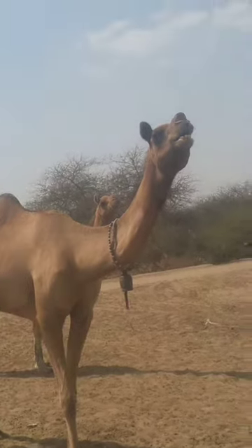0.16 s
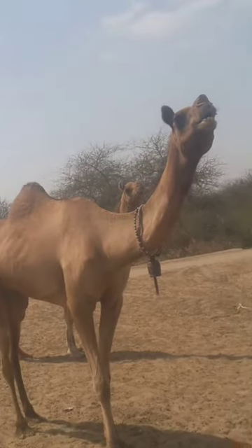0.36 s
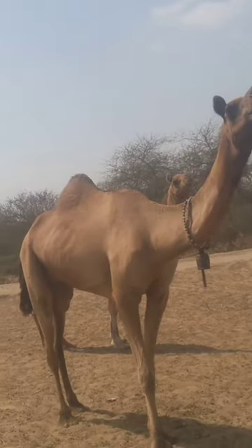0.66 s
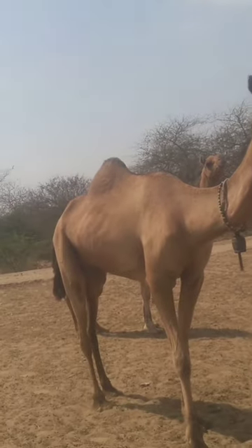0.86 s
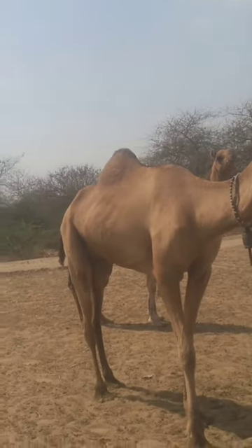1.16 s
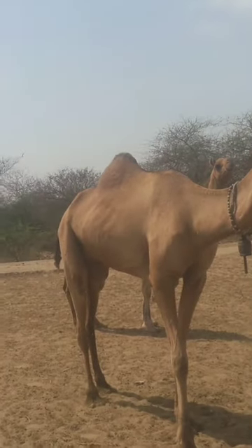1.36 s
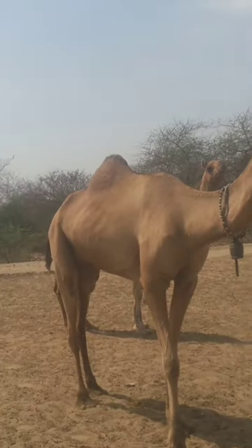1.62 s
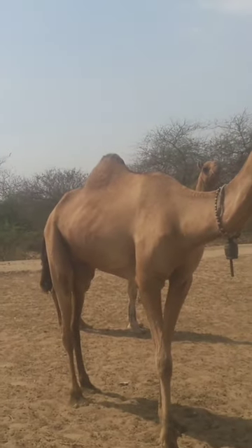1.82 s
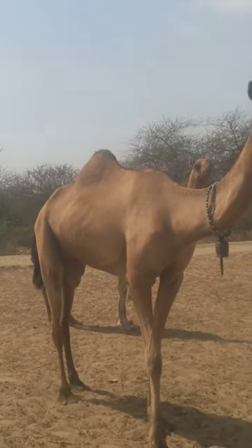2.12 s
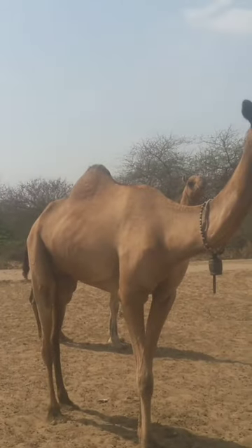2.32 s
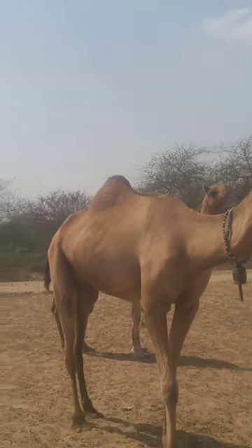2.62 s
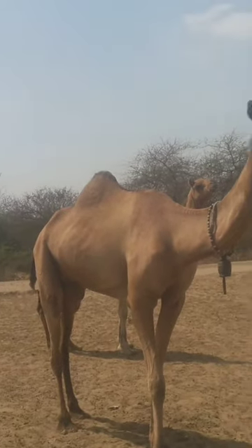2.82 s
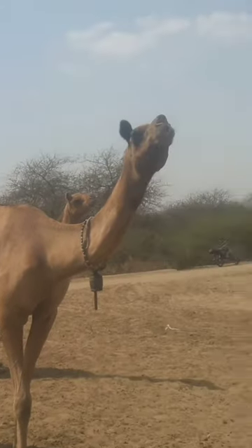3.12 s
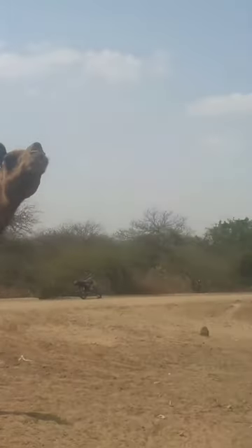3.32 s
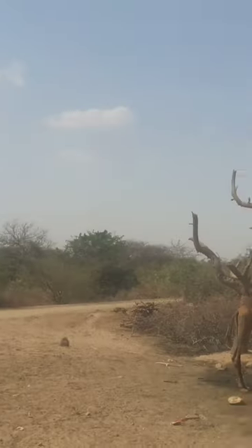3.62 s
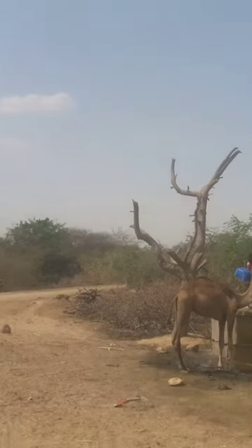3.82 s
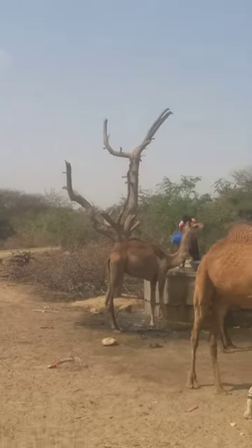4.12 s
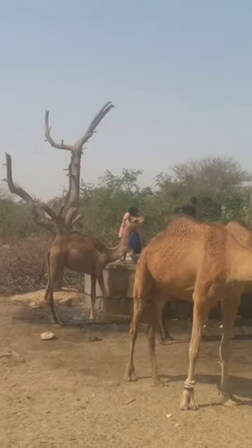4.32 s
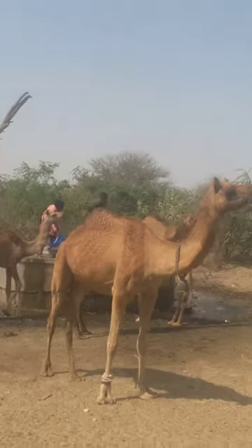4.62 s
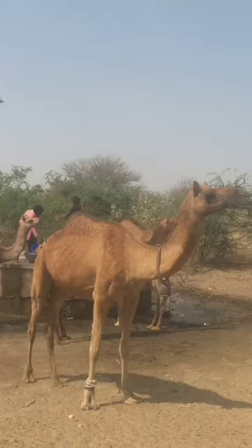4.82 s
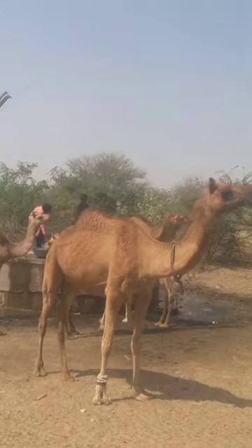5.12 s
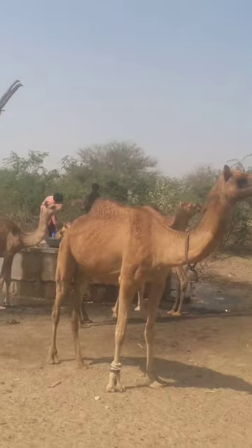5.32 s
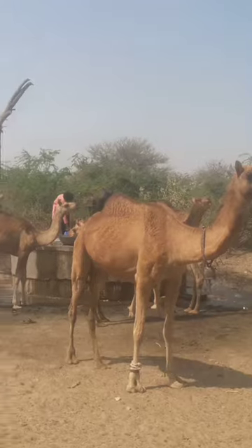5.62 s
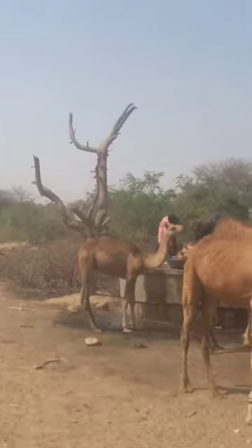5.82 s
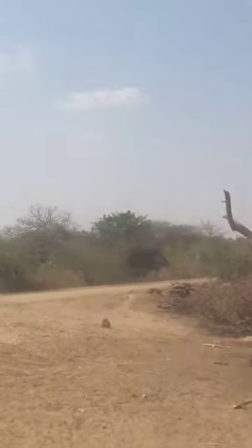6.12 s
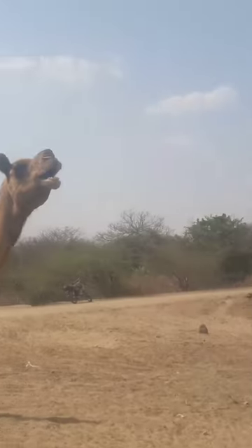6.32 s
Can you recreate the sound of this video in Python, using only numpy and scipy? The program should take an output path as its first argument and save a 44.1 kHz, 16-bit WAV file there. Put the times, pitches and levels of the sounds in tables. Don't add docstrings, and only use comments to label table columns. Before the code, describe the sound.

Outdoors, wind rumble, a puttering distant engine and faint birds, then a nearby camel suddenly bellows, a low rough rattling moan cut off at full strength.

```python
import sys
import numpy as np
from scipy import signal
from scipy.io import wavfile
from scipy.ndimage import uniform_filter1d, minimum_filter1d

SR = 44100
rng = np.random.default_rng(int(sys.argv[2]) if len(sys.argv) > 2 else 0)


def materialize(psi):
    bounded = np.clip(np.atleast_2d(psi).T, -1, 1)
    quanta = np.round(bounded * 32767).astype(np.int16)
    wavfile.write(sys.argv[1], SR, quanta)


def volts_from_decibels(level):
    exponent = np.asarray(level, float) / 20
    return 10 ** exponent


N = 284886
TIME = np.arange(N) / SR
JAW_DROPS_S = 5.745
# time_s, slap_db, brightness_db, stall_depth_db
SLAPS = [(5.756, -29, -9.5, -6), (5.77, -29, -4, 5), (5.782, -29.5, -5, -3.5), (5.797, -30, -17.5, -3),
         (5.812, -29, -8.5, -8), (5.823, -28.5, -8, 0), (5.838, -29, -22.5, -0.5), (5.865, -28.5, -10, -3),
         (5.878, -31.5, -8.5, -2), (5.888, -30, -8.5, -7), (5.898, -32.5, -18, -5), (5.92, -32, -7, -16),
         (5.941, -38, -20, -8.5), (5.964, -25, -11.5, -7.5), (5.977, -25, -18.5, -3),
         (5.999, -34, -15.5, -8), (6.02, -25.5, -8, 1.5), (6.029, -33.5, -14, -3), (6.042, -29, -21, -0.5),
         (6.068, -31, -9.5, -5), (6.078, -34.5, -22, -4.5), (6.106, -26, -24, -7),
         (6.118, -19.5, -24.5, -8), (6.13, -30.5, -20, -3.5), (6.174, -16, -18.5, -1),
         (6.186, -26.5, -23.5, -7.5), (6.2, -24, -19, -4.5), (6.213, -25.5, -15, -5.5),
         (6.239, -23, -21, -0.5), (6.264, -21.5, -20.5, 1), (6.276, -21, -22, 2), (6.3, -28, -21, -5),
         (6.311, -29, -19.5, -3), (6.325, -22, -12.5, -4.5), (6.355, -22.5, -6, -12.5),
         (6.363, -26, -19, 1), (6.377, -17, -16, -2.5), (6.39, -28.5, -22, -7), (6.402, -24, -7.5, -2),
         (6.414, -21.5, -24.5, -6), (6.425, -21, -20.5, -6), (6.439, -31, -11, -3)]
# freq_hz, width_hz, level_db
MOUTH_MODES = [(428, 66, 0.5), (920, 290, -4.5), (1040, 110, 1), (1183, 88, 3), (1351, 47, 0.5),
               (1440, 72, -5)]


def evened(x):
    return x / np.sqrt(np.mean(x ** 2) + 1e-20)


def add(mix, start_s, sound):
    part = mix[round(start_s * SR):][:len(sound)]
    part += sound[:len(part)]


def follow(rows, t):
    return np.interp(t, *np.transpose(rows))


def curves(rows):
    s, *columns = np.transpose(rows)
    t = np.arange(s[0], s[-1], 1 / SR)
    return t, [np.interp(t, s, c) for c in columns]


def drift(size, rate_hz):
    width = int(SR / rate_hz)
    return evened(uniform_filter1d(uniform_filter1d(rng.standard_normal(size), width), width))


def resonate(x, hz, width_hz):
    turn = np.exp(2j * np.pi * np.cumsum(hz * np.ones(len(x))) / SR)
    r = np.exp(-np.pi * width_hz / SR)
    return 2 * (turn * signal.lfilter([1 - r], [1, -r], x / turn)).real


def lowpass(x, order, cutoff_hz):
    return signal.lfilter(*signal.butter(order, cutoff_hz, fs=SR), x)


def pulses(rate, spread_db, weak_db, restarts=()):
    turns = np.cumsum(rate) / SR
    for at in restarts:
        turns[at:] += np.ceil(turns[at]) - turns[at]
    cycle = np.floor(turns).astype(int)
    size_db = spread_db * rng.standard_normal(1000) + weak_db * (np.arange(1000) % 2)
    return np.diff(cycle, prepend=0) * volts_from_decibels(size_db[cycle])


def noise(shape, patchy_db):
    hz = np.fft.rfftfreq(1024, 1 / SR)
    a, b, patches = rng.standard_normal((N // 256 + 5, 513, 3)).T
    patches = evened(uniform_filter1d(uniform_filter1d(patches, 10, 0), 8, 1))
    f, db = np.transpose(shape)
    colour_db = np.interp(np.log(hz + 1), np.log(f), db, left=-90, right=-90)
    spectra = (a + 1j * b) * volts_from_decibels(colour_db[:, None] + patchy_db * patches)
    return evened(signal.istft(spectra, nperseg=1024, noverlap=768)[1][:N])


def tone(rows, orders, waver_db):
    t, (hz, db) = curves(rows)
    turns = np.cumsum(hz) / SR
    stack = sum(volts_from_decibels(d + waver_db * drift(len(t), 0.89)) * np.sin(2 * np.pi * k * turns) for k, d in orders)
    fades = signal.windows.tukey(len(t), min(0.055 * SR / len(t), 1))
    return t[0], np.sqrt(2) * volts_from_decibels(db) * stack * fades


def wind_and_road():
    # time_s, level_db
    wind_level = [(0, -45.5), (.8, -44.5), (1.6, -40.5), (2.4, -43.5), (3.1, -41.5), (4.0, -44), (4.8, -48),
                  (5.5, -48.5)]
    breeze_level = [(0, -67.5), (.8, -66), (1.6, -66.5), (2.1, -71.5), (4.3, -75.5), (4.8, -73.5)]
    # freq_hz, level_db
    rumble_colour = [(15, -35), (40, -24), (80, -1.5), (140, 2), (250, -4), (460, -16), (520, -28),
                     (900, -39.5)]
    rustle_colour = [(1500, -31.5), (2100, 1.5), (2600, 2.5), (3100, -5), (3600, -11.5), (5000, -30),
                     (8000, -52.5)]
    wash_colour = [(100, -12), (300, -6.5), (600, -1), (1000, -6), (1500, -10.5), (2500, -28.5),
                   (4000, -44)]
    roar_colour = [(1000, -34.5), (1450, -6.5), (1700, 0), (1950, -2.5), (2250, -10), (3000, -37.5)]
    hiss_colour = [(3000, -4.5), (4000, -1.5), (5000, -5), (6300, -10), (8000, -14), (10000, -13),
                   (12500, -6.5), (15700, -8)]
    nearest_s, approach_s, depart_s, far_off_db = 1.83, 1.66, 1, -12.5
    away = (TIME - nearest_s) / np.where(TIME < nearest_s, approach_s, depart_s)
    pass_db = far_off_db * (1 - np.exp(-away ** 2))
    calm_db = -5 * np.clip((0.6 - TIME) / 0.011, 0, 1)
    lumps_db = 0.24 * drift(N, 30) + calm_db
    rumble = volts_from_decibels(follow(wind_level, TIME) + lumps_db - 1.5) * noise(rumble_colour, 0.86)
    rustle = volts_from_decibels(follow(breeze_level, TIME)) * noise(rustle_colour, 2.6)
    wash = volts_from_decibels(-58 + 0.42 * pass_db) * noise(wash_colour, 1.6)
    roar = volts_from_decibels(-63.5 + pass_db) * noise(roar_colour, 1.4)
    return rumble + rustle + wash + roar + volts_from_decibels(-79) * noise(hiss_colour, 0.3)


def putter():
    # time_s, firings_per_s
    firing = [(0, 28), (.8, 28.7), (1.7, 28.9), (2.9, 29.45), (3.5, 29.5), (3.8, 29.9), (4.4, 30),
              (4.7, 29.2), (5.6, 28.9)]
    # time_s, level_db
    putter_level = [(0, -56), (.58, -55.5), (.63, -49), (1.5, -51), (2.3, -51), (3.0, -56), (3.6, -56),
                    (4.3, -57.5), (5.0, -56.5), (5.599, -57.5)]
    # freq_hz, width_hz, level_db
    exhaust = [(131, 180, -11.5), (271, 156, 1.5), (419, 20, 0.5)]
    # multiple, level_db (re pops)
    pipe_orders = [(3, -3), (4, 1), (5, 2), (6, -6), (8, -5)]
    rate = follow(firing, TIME) * (1 + 0.0027 * drift(N, 25))
    pops = -pulses(rate, spread_db=2.5, weak_db=0.5)
    pipe = sum(volts_from_decibels(d) * resonate(pops, hz, w) for hz, w, d in exhaust)
    pipe = evened(signal.lfilter(*signal.cheby1(4, 1, 480, fs=SR), pipe))
    turns = np.cumsum(rate) / SR
    hum = sum(volts_from_decibels(d + 2 * drift(N, 4)) * np.sin(2 * np.pi * k * turns + k * k) for k, d in pipe_orders)
    fade = np.clip((putter_level[-1][0] - TIME) / 0.05, 0, 1)
    return volts_from_decibels(follow(putter_level, TIME)) * (pipe + hum) * fade


def drone():
    # time_s, level_db
    drone_level = [(0, -71), (1.5, -51.5), (2.5, -54), (3.502, -58), (3.8, -51), (4.5, -49), (5.1, -51.5),
                   (5.799, -46), (6.0, -60)]
    # time_s, pitch_hz
    drone_pitch = [(0, 67), (.6, 70.9), (1.4, 73.2), (2.4, 78.2), (3.4, 81.6), (3.8, 84.5), (5.0, 88.6),
                   (6.0, 91.5)]
    # multiple, level_db
    drone_orders = [(1, 0), (2, 0), (3, -10), (4, -16)]
    rows = [(s, follow(drone_pitch, s), db) for s, db in drone_level]
    return tone(rows, drone_orders, waver_db=0.6)


def whistle(hz, fall_hz, length_s, db):
    u = np.linspace(0, 1, int(1.17 * length_s * SR))
    pitch_hz = hz + fall_hz * ((1 - u) ** 1.58 - 0.4)
    return volts_from_decibels(db) * np.hanning(len(u)) * np.sin(2 * np.pi * np.cumsum(pitch_hz) / SR)


def birds():
    # start_s, pitch_hz, length_s, level_db
    chirp_notes = [(0.001, 3120, .012, -62), (0.04, 2960, 0.008, -56), (0.404, 2760, .01, -58),
                   (.564, 2950, .006, -57), (.754, 3350, .01, -64), (.918, 2460, .012, -59),
                   (3.765, 3700, .014, -70), (2.912, 4380, .014, -72), (2.922, 3950, .01, -74),
                   (3.052, 4250, .016, -69), (3.062, 3850, .01, -74), (0.172, 2780, .008, -55.5),
                   (0.228, 2630, .008, -55), (0.26, 2710, .008, -65), (0.319, 2810, 0.01, -58),
                   (0.327, 3200, 0.016, -60), (.378, 3260, .01, -63), (0.553, 2520, 0.011, -55),
                   (0.576, 2830, 0.0086, -57), (0.645, 3320, .01, -59), (0.658, 3450, 0.022, -61),
                   (0.652, 3930, .008, -65), (1.218, 3830, .008, -64), (1.085, 2660, .01, -70),
                   (0.748, 3050, 0.0074, -54), (.85, 3210, 0.016, -56), (0.898, 3200, 0.0072, -57),
                   (1.205, 3360, 0.008, -61), (1.227, 3450, 0.019, -58), (1.489, 2830, 0.02, -59),
                   (2.6, 2980, 0.01, -61), (4.947, 2820, 0.0027, -49.5), (5.34, 2300, 0.0057, -52)]
    peep_notes = [(0.079, 2655, 0.038, -56), (0.4, 2646, 0.037, -61), (1.545, 3400, 0.015, -61.5),
                  (2.644, 2660, 0.017, -61.5), (2.525, 2510, .015, -64), (3.385, 2870, 0.014, -66),
                  (0.42, 2670, .025, -62), (2.79, 3050, .012, -70), (3.772, 3280, .012, -71),
                  (3.675, 2540, 0.014, -66), (.95, 2600, .025, -63), (.98, 2350, .02, -62),
                  (3.129, 2950, .012, -66), (3.392, 2400, 0.019, -63), (3.565, 2280, 0.024, -65),
                  (3.75, 970, .03, -64), (4.44, 820, 0.024, -55), (4.455, 1000, 0.012, -54),
                  (4.445, 1400, 0.013, -57), (4.468, 1490, 0.0093, -55), (4.468, 2250, .008, -61),
                  (4.49, 512, 0.046, -51.5), (4.545, 1525, 0.064, -65.5), (4.6, 1220, 0.11, -63.5),
                  (5.18, 1246, 0.016, -59.5), (5.247, 2510, 0.016, -60)]
    track = np.zeros(N)
    for rows, fall_share in ((chirp_notes, 0.17), (peep_notes, 0.02)):
        for s, hz, length_s, db in rows:
            fall_hz = fall_share * hz * (0.01 / length_s) ** 0.5
            add(track, s - 0.069 * length_s, whistle(hz, fall_hz, length_s, db))
    return track


def thump(db, hz):
    t = np.arange(0.05 * SR) / SR
    turns = np.cumsum(hz * (0.58 + 1.79 * np.exp(-t / 0.0039))) / SR
    shape = (1 - np.exp(-t / 0.002)) ** 2 * np.exp(-(t / 0.0087) ** 2)
    swing = -1.3 * volts_from_decibels(db) * np.sin(2 * np.pi * (turns + 0.05)) * shape
    return np.r_[np.zeros(380), swing]


def gusts():
    # start_s, peak_db, pitch_hz
    gust_rows = [(0.601, -53, 143), (0.787, -30, 136), (0.929, -37, 107), (1.018, -34.5, 224),
                 (1.115, -25, 141), (1.427, -30, 65), (1.498, -33, 127), (1.508, -17.5, 127),
                 (1.533, -44, 113), (1.582, -18.5, 148), (1.669, -27.5, 91.5), (2.213, -25, 109),
                 (2.359, -30, 140), (2.6, -29, 88.8), (2.678, -56, 166), (3.429, -25.5, 166),
                 (3.458, -27, 92), (4.142, -40, 159), (4.557, -32.5, 124), (5.299, -35, 181)]
    track = np.zeros(N)
    for s, db, hz in gust_rows:
        add(track, s, thump(db, hz))
    return track


def scuffs():
    # start_s, length_s, low_hz, high_hz, level_db
    scuff_rows = [(1.27, .15, 3200, 5800, -80), (1.435, .015, 3200, 7000, -76),
                  (1.555, .09, 3300, 4900, -71.5), (1.57, .075, 4800, 7600, -82),
                  (2.6, .02, 3000, 5500, -79), (3.42, .02, 2600, 3900, -75), (5.01, .03, 3600, 4400, -76),
                  (4.51, .015, 600, 1900, -62), (4.44, .035, 2000, 3900, -71), (4.5, .08, 1300, 2600, -71),
                  (4.72, .04, 2600, 3300, -71), (4.82, .05, 2400, 3200, -73), (4.865, .02, 3500, 4100, -76),
                  (4.95, .06, 2400, 3300, -72), (5.09, .08, 1800, 3300, -70), (5.25, .06, 2300, 3400, -71),
                  (5.41, .06, 2400, 3300, -72)]
    track = np.zeros(N)
    grains = volts_from_decibels(2.1 * drift(SR // 3, 300))
    for s, length_s, low_hz, high_hz, db in scuff_rows:
        grit = (rng.standard_normal(SR // 3) * grains)[:int(1.3 * length_s * SR)]
        band = signal.lfilter(*signal.butter(3, [low_hz, high_hz], "band", fs=SR), grit)
        add(track, s, volts_from_decibels(db) * evened(band) * signal.windows.tukey(len(band), 0.5))
    return track


def far_calls():
    # start_s, length_s, pitch_hz, level_db
    call_rows = [
        (4.755, 0.257, 225.2, -51),
        (5.143, 0.16, 222.5, -51.5),
    ]
    ends_db, rise_hz = -5, 1.6
    track = np.zeros(N)
    for s, length_s, hz, db in call_rows:
        rows = [(s, hz - rise_hz, db + ends_db), (s + length_s / 2, hz, db),
                (s + length_s, hz + rise_hz, db + ends_db)]
        add(track, *tone(rows, [(1, -5), (2, -5), (3, -19)], waver_db=2))
    return track


def opening_note():
    # time_s, pitch_hz, level_db
    note_path = [(5.51, 233, -49), (5.53, 236.7, -32.5), (5.554, 221.4, -23), (5.59, 230.3, -25.5),
                 (5.62, 243, -32)]
    # multiple, level_db
    note_orders = [(1, 2), (2, -19), (3, -23), (4, -40), (5, -37.5)]
    return tone(note_path, note_orders, waver_db=0.33)


def ring(drive, hz, width_hz, hold):
    x = resonate(resonate(drive, hz, width_hz), hz, 3 * width_hz)
    swing = np.sqrt(uniform_filter1d(uniform_filter1d(x ** 2, 300), 300) + 1e-12)
    return evened(resonate(resonate(x / swing ** hold, hz, 82), hz, 190))


def body_band(drive, hz, width_hz, db):
    return volts_from_decibels(db) * evened(resonate(resonate(drive, hz, width_hz), hz, width_hz))


def hollow(x, modes, quick=3):
    return sum((-1) ** k * volts_from_decibels(db) * resonate(resonate(x, hz, w), hz, quick * w) / np.sqrt(w)
               for k, (hz, w, db) in enumerate(modes))


def palate(x, t):
    # freq_hz, width_hz, level_db
    palate_modes = [(1680, 85, -1.5), (1945, 85, -1)]
    gape_modes = [(2350, 110, -11), (2540, 240, -12)]
    # time_s, level_db
    gape_level = [(5.75, -15), (5.95, -8), (6.1, -4), (6.46, 2)]
    # freq_hz, width_hz, level_db, change_db_per_s
    teeth_mode = (2873.5, 200.5, -13, -17)
    open_s = t - JAW_DROPS_S
    sag = 1 - 0.066 * open_s
    teeth_hz, teeth_width_hz, teeth_db, teeth_db_per_s = teeth_mode
    roof = hollow(x, [(hz * sag, w, db) for hz, w, db in palate_modes])
    teeth = hollow(x, [(teeth_hz - 230 * open_s, teeth_width_hz, teeth_db)])
    gape = volts_from_decibels(follow(gape_level, t)) * hollow(x, gape_modes)
    return roof + volts_from_decibels(teeth_db_per_s * open_s) * teeth + gape


def fold_pulses(t):
    # time_s, pulses_per_s
    fold_rate = [(5.5, 88), (5.75, 72.6), (6.0, 92.3), (6.2, 81), (6.46, 86)]
    rate = follow(fold_rate, t) * (1 + 0.1 * drift(len(t), 60))
    restarts = [int((row[0] - t[0]) * SR) for row in SLAPS]
    return evened(pulses(rate, spread_db=2.5, weak_db=-3.5, restarts=restarts))


def slap_smacks(t):
    at_mouth, at_palate = np.zeros((2, len(t)))
    for s, db, bright_db, _ in SLAPS:
        wet = rng.standard_normal(400) * np.exp(-np.arange(400) / 45) / 22
        wet[0] = 1
        add(at_mouth, s - t[0], wet * volts_from_decibels(db))
        add(at_palate, s - t[0], wet * volts_from_decibels(db + bright_db + 5))
    mouth = lowpass(hollow(at_mouth, MOUTH_MODES, quick=6.9), 2, 1900)
    return volts_from_decibels(48.5) * mouth + volts_from_decibels(55) * palate(at_palate, t)


def nose_buzz(t, turbulence):
    # freq_hz, width_hz, level_db
    nose_modes = [(1000, 70, -0.5), (1190, 130, -1.5), (1670, 87, -5), (1946, 80, 1), (2400, 120, -21.5),
                  (3050, 250, -15.5)]
    # time_s, level_db
    snort_rows = [(5.552, -45.5), (5.566, -50), (5.58, -48.5), (5.592, -43), (5.607, -50), (5.62, -48),
                  (5.65, -52), (5.688, -49), (5.706, -47), (5.73, -48), (5.743, -51)]
    clicks = np.zeros(len(t))
    clicks[[int((s - t[0]) * SR) for s, db in snort_rows]] = volts_from_decibels([db for s, db in snort_rows])
    nose = volts_from_decibels(-3.5) * evened(hollow(turbulence, nose_modes)) + volts_from_decibels(108) * hollow(clicks, nose_modes)
    return nose * np.clip((t - 5.549) / 0.0048, 0, 1)


def gulps(t):
    # lowest_s, run_down_s, chest_db, throat_db
    gulp_rows = [(5.623, .012, -10.5, -3.5), (5.647, 0.016, -12, -6.5), (5.69, .01, -9, 1),
                 (5.724, 0.02, -18.5, 3.5), (5.747, 0.019, -15, 3.5), (5.809, 0.013, -17.5, -10.5),
                 (5.861, 0.013, -20, -4.5), (5.916, 0.021, -4.5, -9.5), (5.949, 0.014, 0.5, -16.5),
                 (5.999, 0.014, -5.5, -14), (6.021, 0.007, 2, -14), (6.081, .03, -7.5, -5.5),
                 (6.121, 0.031, -10, -6), (6.15, 0.018, -2, -13.5), (6.177, 0.011, -10, -17.5),
                 (6.2, 0.013, -4.5, -12), (6.225, .015, 2, -4), (6.254, 0.0033, -8, -6),
                 (6.272, 0.013, -9, 4.5), (6.295, 0.012, -4.5, -9.5), (6.309, 0.011, -12.5, -4),
                 (6.341, 0.012, -4, -12.5), (6.36, 0.0099, -6, -7.5), (6.387, 0.032, -4, 2),
                 (6.414, 0.022, 0.5, -13), (6.446, 0.011, 1.5, -5), (6.46, .004, -2.5, -0.5)]
    jump_back_s = 0.0029
    return sum(np.outer(db, np.exp(-((t - s) / np.where(t < s, run_down_s, jump_back_s)) ** 2))
               for s, run_down_s, *db in gulp_rows)


def scattered(rasp):
    scatter = rng.standard_normal(3000) * np.exp(-np.arange(3000) / SR / 0.012)
    scatter = scatter / np.linalg.norm(scatter)
    return rasp + volts_from_decibels(-9) * signal.oaconvolve(rasp, scatter)[:len(rasp)]


def bellow():
    # time_s, effort_db
    effort = [(5.52, -53), (5.545, -28), (5.6, -24), (5.67, -28.5), (5.74, -24.5), (5.78, -20),
              (6.05, -16.5), (6.2, -16), (6.46, -17)]
    # time_s, pitch_hz
    chest_pitch = [(5.66, 224), (5.79, 224), (5.845, 241), (5.92, 233), (6.05, 240), (6.11, 227),
                   (6.23, 244), (6.34, 231), (6.43, 241)]
    throat_pitch = [(5.61, 676), (5.74, 645), (5.87, 670), (5.96, 645), (6.09, 674), (6.125, 628),
                    (6.25, 640), (6.41, 680), (6.46, 630)]
    # freq_hz, width_hz, level_db
    cheek_band = (470, 190, -24)
    belly_band = (150, 42, -24.5)
    muffle_band = (310, 114, -12.5)
    fuzz_band = (300, 53, -20.5)
    teeth_hiss = [(3710, 270, -5), (4420, 360, -4.5), (5340, 570, -15.5)]
    # freq_hz, width_hz
    pockets = [(560, 30), (1505, 80), (1775, 22), (2190, 40)]
    t, (effort_db,) = curves(effort)
    size = len(t)

    cry_db = effort_db + 18
    throat_db = -31.5 + 0.86 * cry_db
    mouth_db = -42 + 0.5 * cry_db
    palate_db = -47 + 1.21 * cry_db - 13 * (t - JAW_DROPS_S)
    joins_s, rise_s = 5.6, 0.036
    chest_db = effort_db - 40 * np.clip(1 - (t - joins_s) / rise_s, 0, 2) ** 2
    jaw = np.clip((t - JAW_DROPS_S) / 0.018, 0, 1)
    flutter_db = 1.5 * drift(size, 44)

    slap_s = np.transpose(SLAPS)[0]
    last_slap_s = slap_s[np.maximum(np.searchsorted(slap_s, t) - 1, 0)]
    since_slap_s = (t - last_slap_s) * (t > slap_s[0])
    near_slap = (minimum_filter1d(since_slap_s, size=400) < 1 / SR) & (t > slap_s[0] - 0.005)
    stall_db = sum(depth_db * np.exp(-((t - s + 0.0055) / 0.0019) ** 2) for s, _, _, depth_db in SLAPS)

    folds = fold_pulses(t)
    puffs = signal.lfilter([1], [1, -0.995], folds) + 3
    turbulence = evened(puffs * rng.standard_normal(size))
    drive = folds + 0.8 * turbulence
    loose = 0.6 * folds * ~near_slap + 0.8 * turbulence

    choke_db, hush_db = gulps(t)
    chest_hz = follow(chest_pitch, t) * (1 + 0.005 * drift(size, 45))
    throat_hz = follow(throat_pitch, t) * (1 + 0.01 * drift(size, 25))
    chest = volts_from_decibels(chest_db + choke_db) * ring(drive, chest_hz, 15, hold=0.95)
    throat = volts_from_decibels(throat_db + 2 + hush_db) * ring(drive, throat_hz, 60, hold=0.75)
    flesh = body_band(drive, *cheek_band) + (1 - jaw) * body_band(drive, *muffle_band)
    flesh = flesh + jaw * (body_band(drive, *belly_band) + body_band(drive, *fuzz_band))

    buzz = volts_from_decibels(mouth_db) * evened(hollow(loose + 0.5 * turbulence, MOUTH_MODES))
    buzz = buzz + volts_from_decibels(palate_db + flutter_db) * evened(palate(loose + turbulence, t))
    buzz = jaw * buzz + (1 - jaw) * volts_from_decibels(palate_db + 5.1) * nose_buzz(t, turbulence)
    fade_db = -110 * uniform_filter1d(since_slap_s, size=150)
    rasp = volts_from_decibels(stall_db + fade_db + 0.4) * buzz + slap_smacks(t)
    rasp = scattered(lowpass(rasp, 5, 3300))

    breath = volts_from_decibels(chest_db - 60.5 + 0.3 * flutter_db) * evened(hollow(turbulence, teeth_hiss))
    sound = breath + lowpass(chest + volts_from_decibels(chest_db) * flesh + throat + rasp, 4, 3800)
    for hz, width_hz in pockets:
        sound = signal.lfilter(*signal.iirnotch(hz, hz / width_hz, SR), sound)
    return t[0], sound * np.minimum((t - t[0]) / 0.01, 1)


def groan():
    # time_s, pitch_hz, level_db
    groan_path = [(5.54, 179, -41), (5.572, 167.7, -41), (5.598, 171.4, -36), (5.73, 158.4, -32.5),
                  (5.764, 154, -46), (5.95, 123, -52.5)]
    return tone(groan_path, [(1, 0), (2, -13), (3, -14)], waver_db=1.6)


def scene():
    mix = wind_and_road() + putter()
    add(mix, *drone())
    mix += birds() + gusts() + scuffs() + far_calls()
    add(mix, *opening_note())
    add(mix, *bellow())
    add(mix, *groan())
    return mix[None]


def low_pass(x):
    return signal.sosfilt(signal.butter(12, 15720, fs=SR, output="sos"), x)


def record(dry):
    ceiling, bias = 0.34, -0.0004
    rounded = dry / (1 + (dry / ceiling) ** 6) ** (1 / 6)
    heard = signal.lfilter(*signal.butter(2, 45, "high", fs=SR), rounded)
    return low_pass(heard + bias)


dry = scene()
out = record(dry)
materialize(out)
```